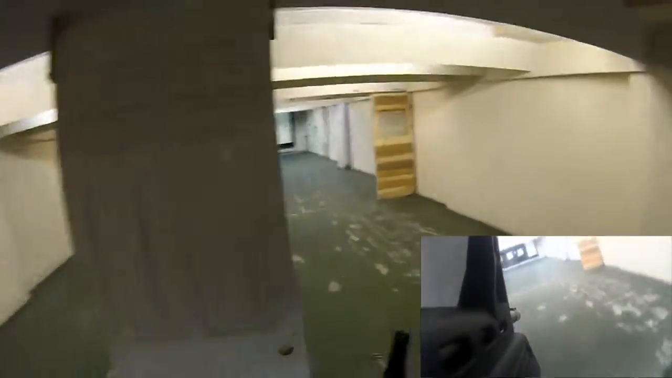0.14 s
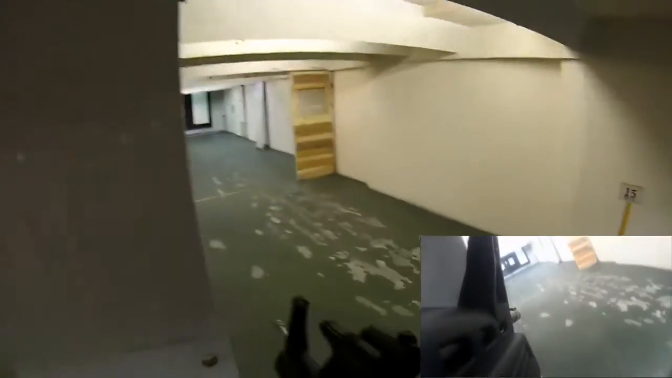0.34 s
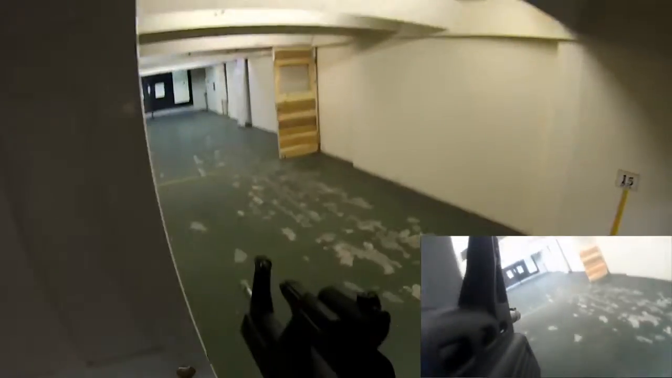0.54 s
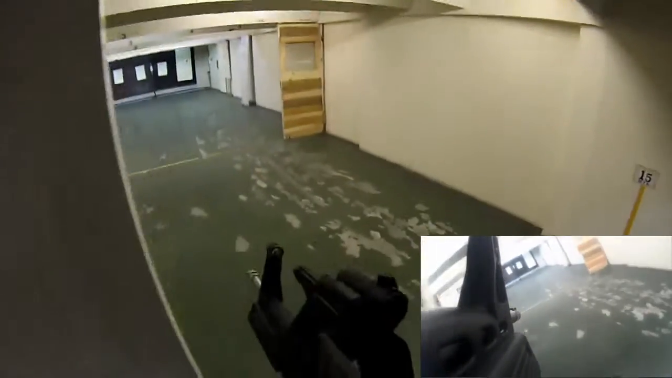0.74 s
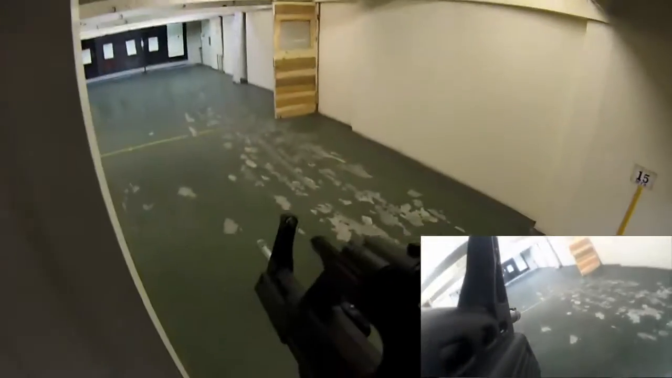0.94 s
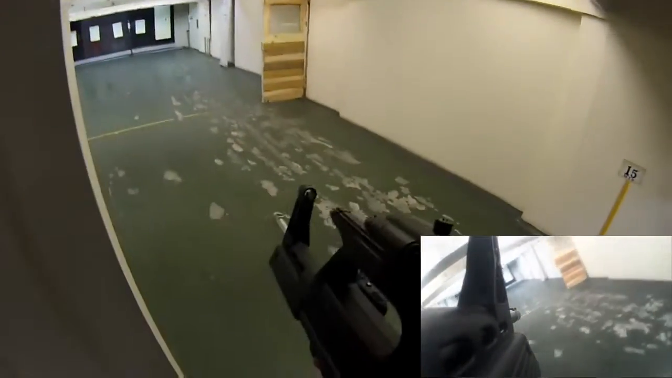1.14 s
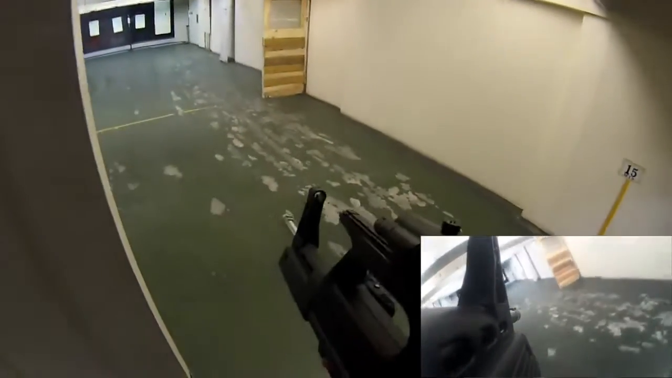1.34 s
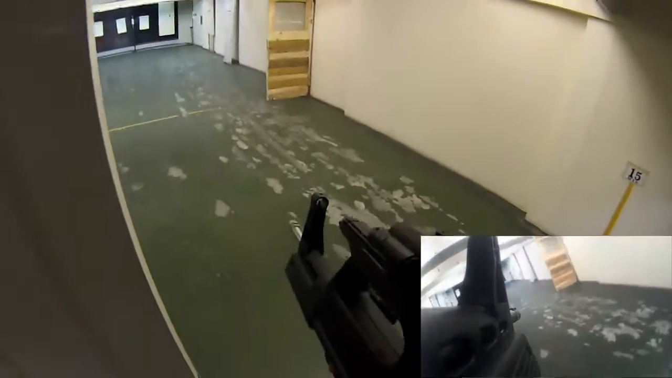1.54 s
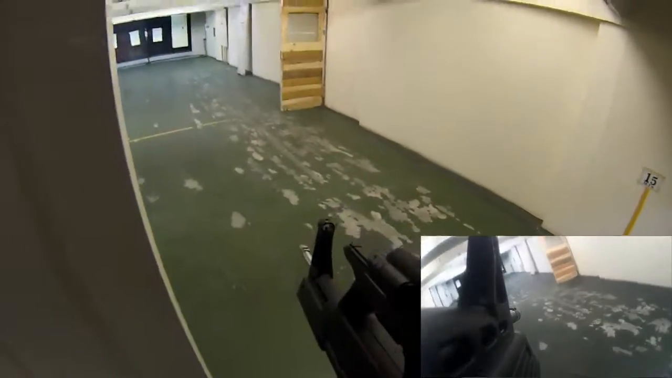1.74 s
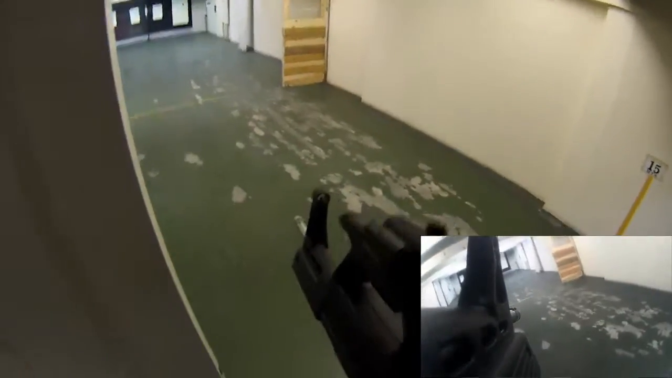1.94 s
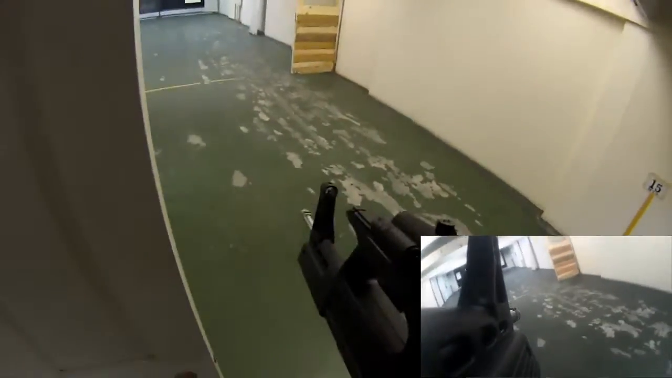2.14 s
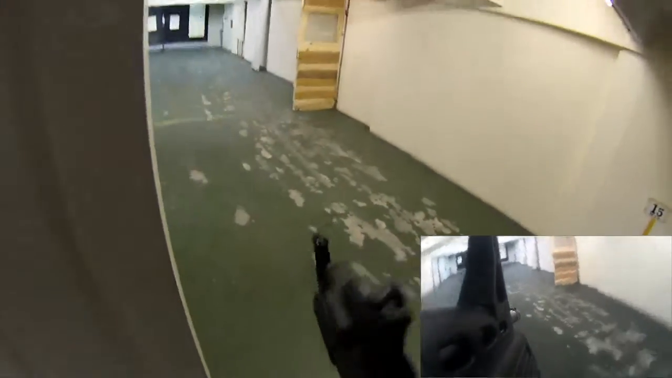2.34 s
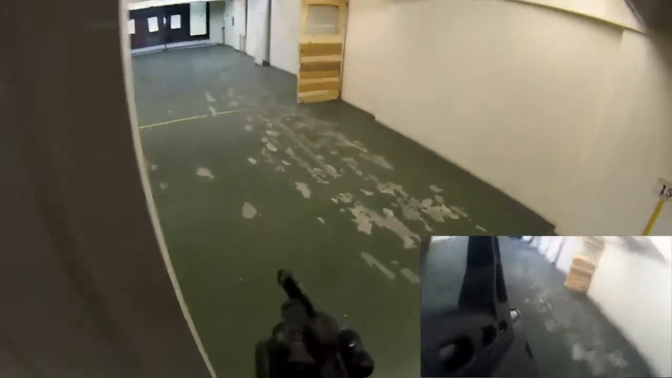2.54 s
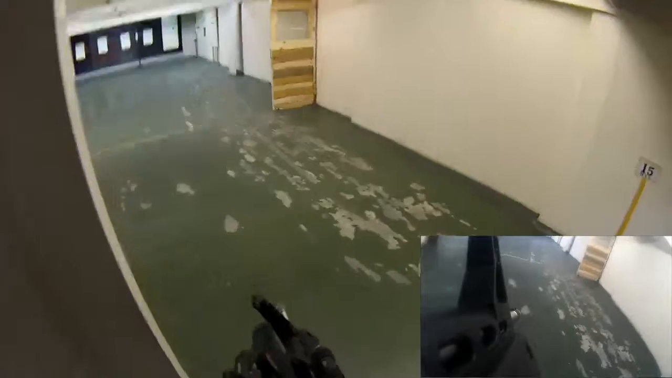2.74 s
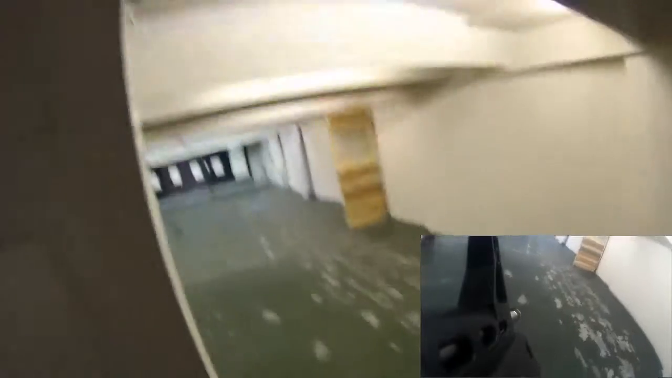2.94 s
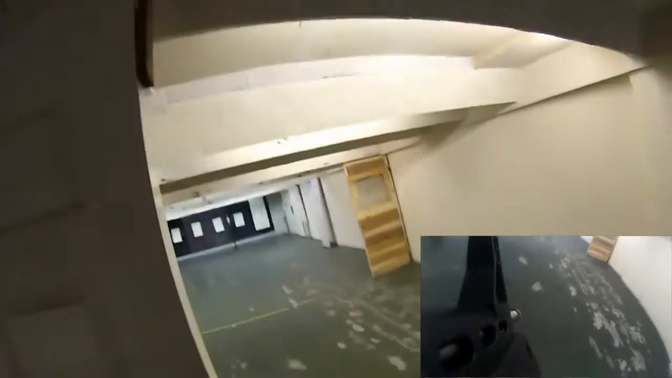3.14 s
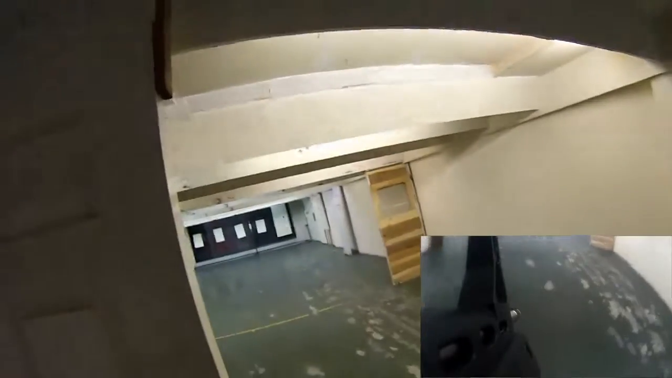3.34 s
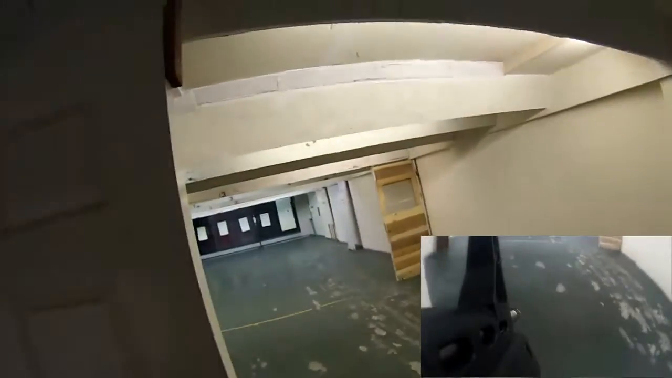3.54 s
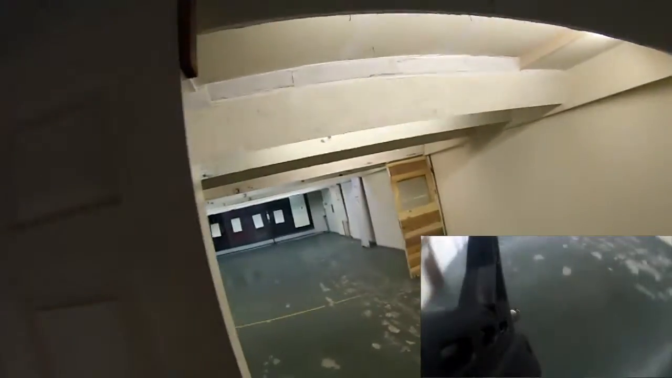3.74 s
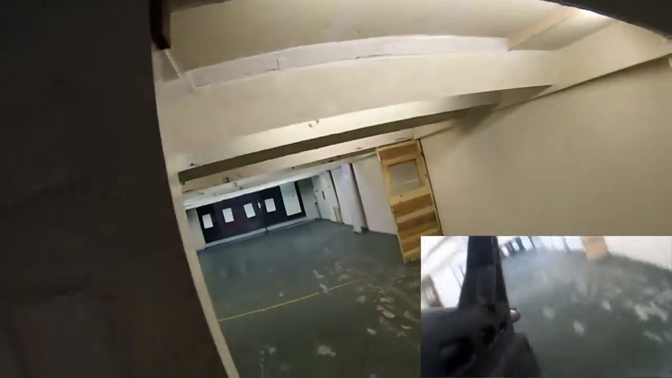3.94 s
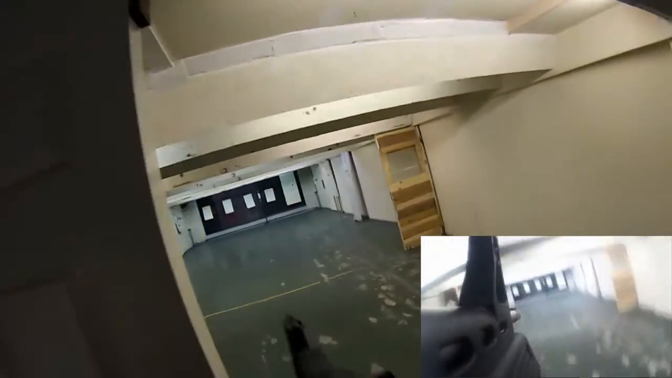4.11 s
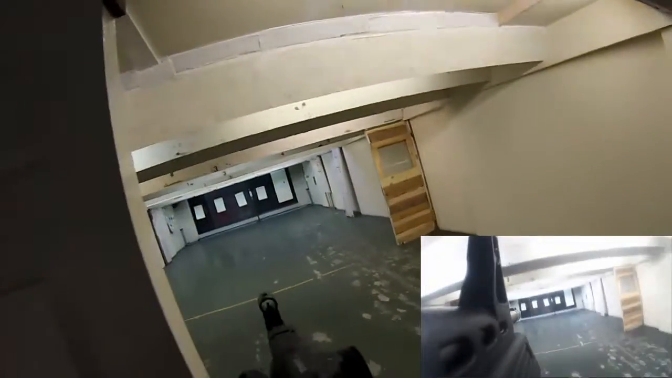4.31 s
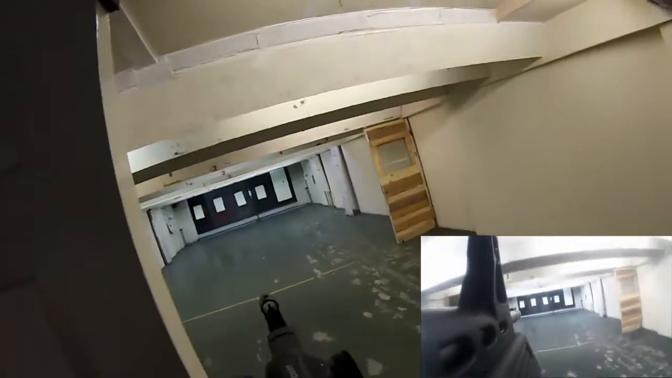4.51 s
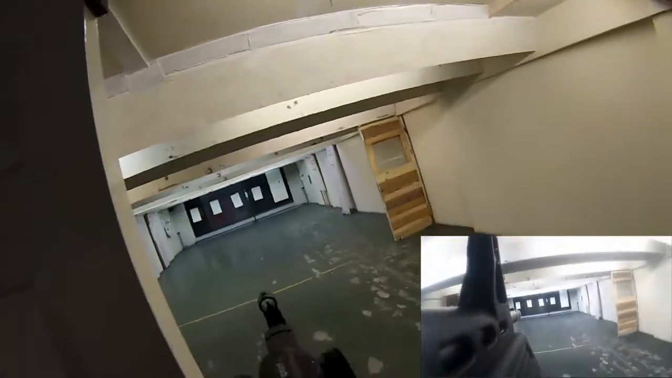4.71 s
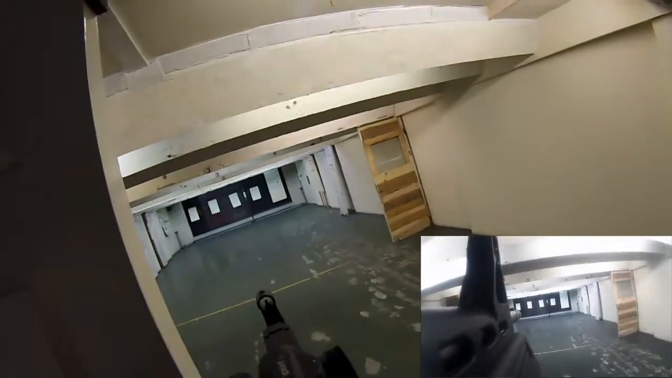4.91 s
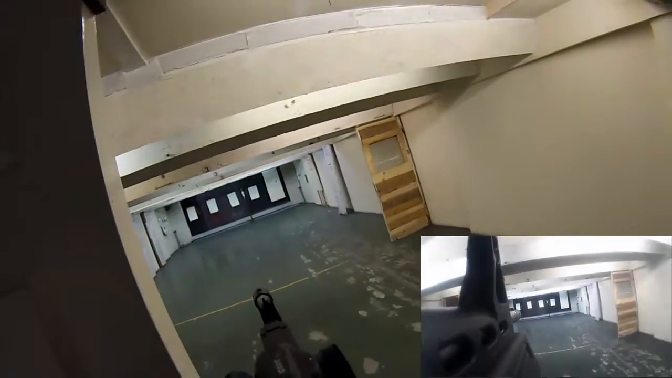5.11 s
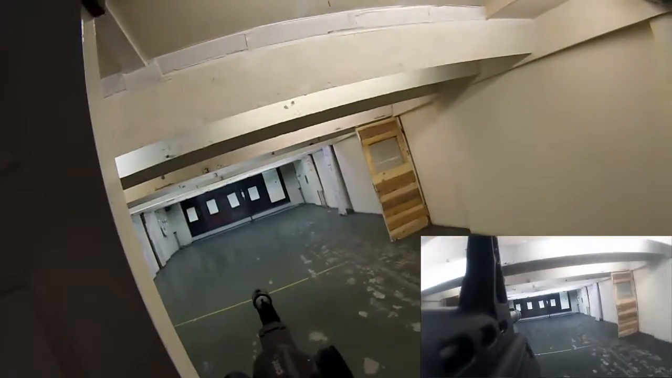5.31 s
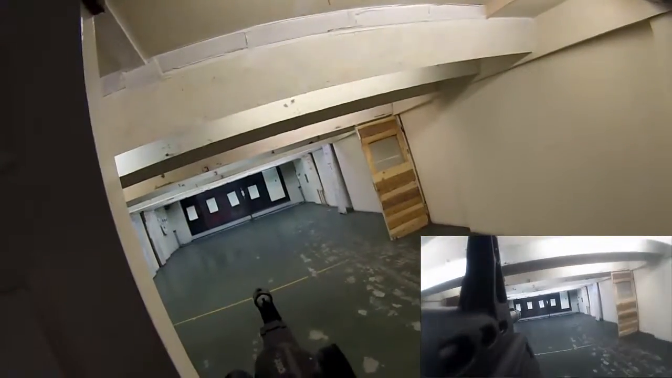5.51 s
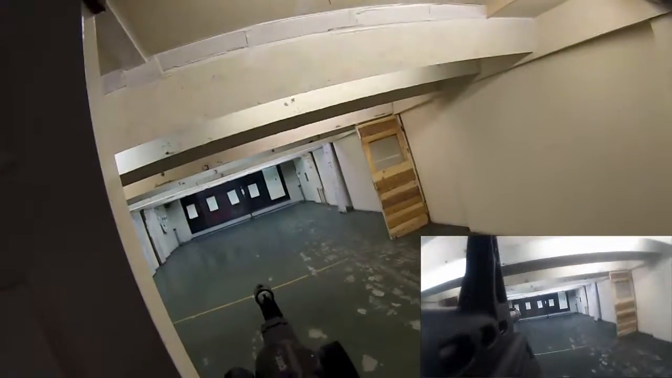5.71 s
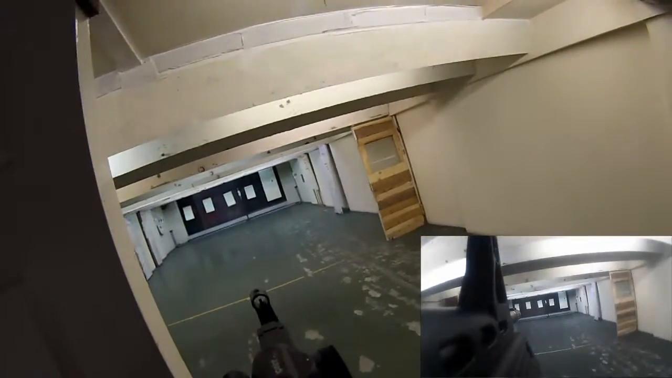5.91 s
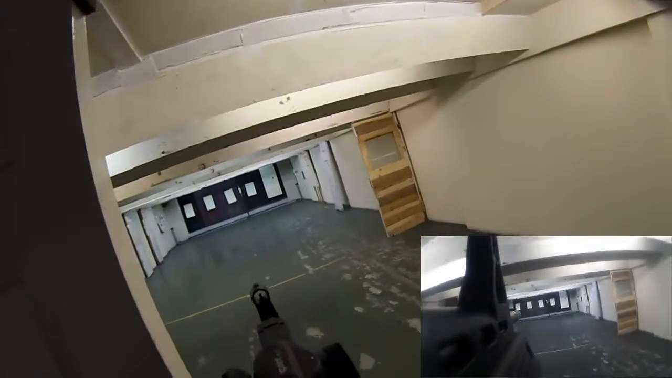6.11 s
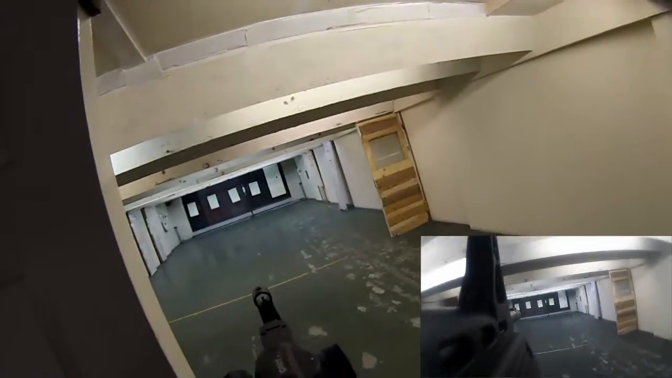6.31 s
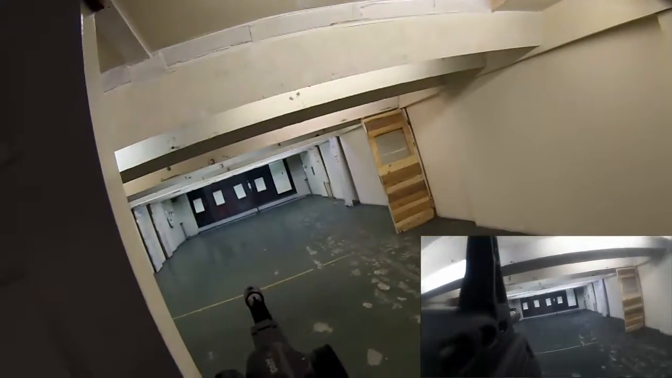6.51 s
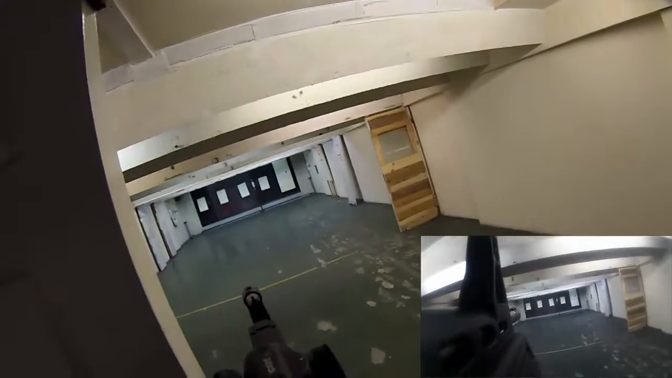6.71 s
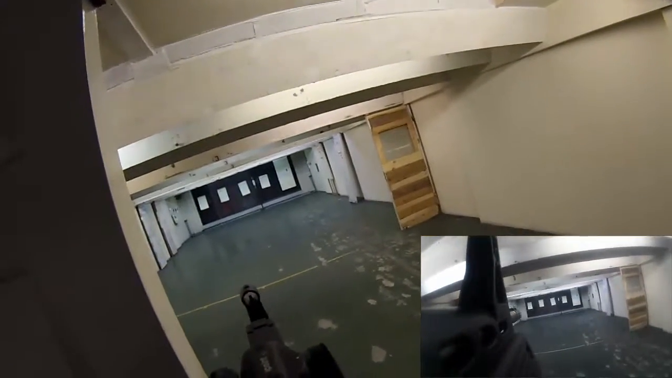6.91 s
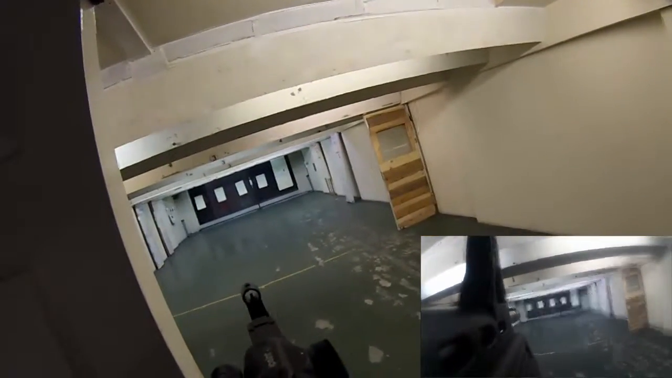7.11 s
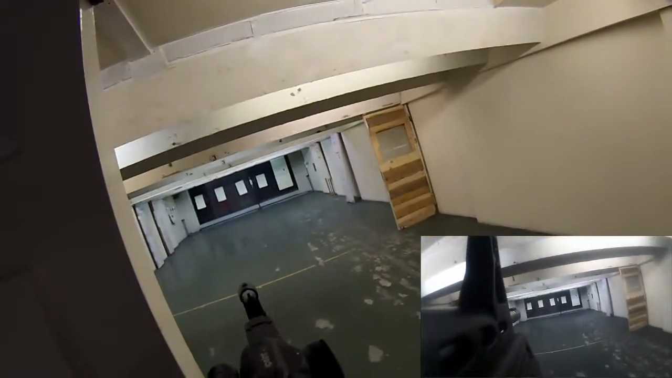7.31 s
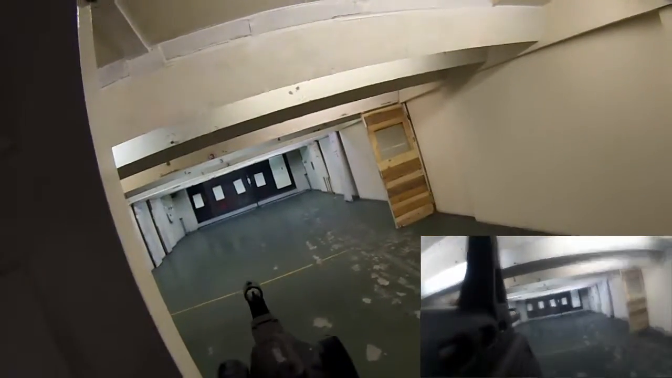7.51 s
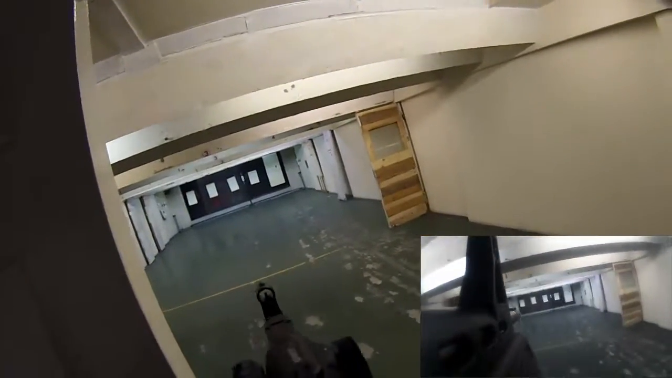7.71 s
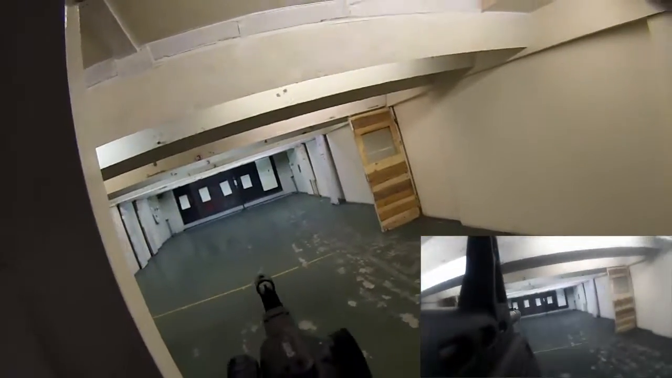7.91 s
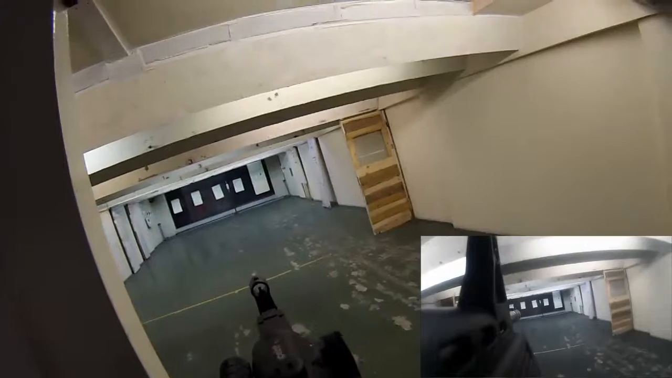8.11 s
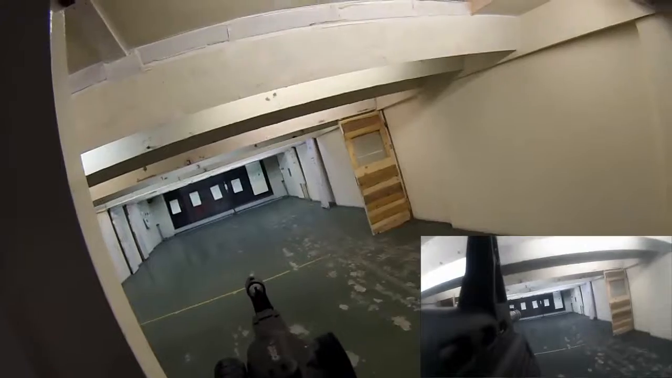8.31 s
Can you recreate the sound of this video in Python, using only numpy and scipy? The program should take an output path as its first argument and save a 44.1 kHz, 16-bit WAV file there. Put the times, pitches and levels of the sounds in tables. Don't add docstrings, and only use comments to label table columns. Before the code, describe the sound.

In a bare, reverberant indoor range, a cased head-worn microphone sits close to someone handling a rifle. From 0 to 1.9 s cloth rubs unevenly while gear bumps in hollow, boxy knocks, strongest around 0.2 s, with small steel ticks. From 2 to 2.6 s the magazine and action clack and rattle; sparser touches follow until firm metallic clacks at 3.4 s. At 3.7 s the bolt slams home, bright and quickly damped, its tone spreading into the hall. Then near silence: faint air and lamp hum, light clicks around 4.6-4.8 and 5.4-5.6 s. Rifle shots explode at 5.65, 6.22, 7.15 and 7.53 s, the last two in quick succession. Each is a harsh, clipped crack with a low push, rapid slaps off pillar and walls, and a long diffuse tail; the sound ducks at every blast, then recovers as the final reverberation fades.

```python
import sys
import numpy as np
from scipy import signal
from scipy.fft import rfft, irfft
from scipy.io import wavfile
from scipy.ndimage import uniform_filter1d

SR = 44100
rng = np.random.default_rng(int(sys.argv[2]) if len(sys.argv) > 2 else 0)


def master(y):
    cut = np.clip(np.atleast_2d(y).T, -1, 1)
    pcm = np.round(cut * 32767)
    wavfile.write(sys.argv[1], SR, pcm.astype(np.int16))


def natural_amplitude(level_db):
    exponent = np.asarray(level_db, float) / 20
    return 10 ** exponent


N = 368235

# f/Hz, density level/dB
AIR_COLOUR = [(15, -43.5), (25, -10), (68, -26), (102, -1.5), (152, -22.5), (188, 2), (258, -13.5),
              (405, -9), (462, -20), (706, -15), (14100, -36.5)]
AIR_DB = -62.5
# f/Hz, level/dB
LAMP_HUM = [(102.3, -72), (199.2, -80), (398.4, -80), (500.6, -78), (699.8, -79), (899.0, -83)]
# f/Hz, density level/dB
CLOTH_COLOUR = [(24, -29.5), (40, 3), (151, -20.5), (192, 4.5), (466, 0.5), (904, 10.5), (1240, -30),
                (1890, -6.5), (2660, -17), (3320, -17.5), (14100, -40.5)]
# t/s, cloth level/dB, body sway level/dB
MOTION = [(.08, -47, -51), (.3, -42, -70), (.53, -50.5, -61), (.62, -43, -52), (.84, -49.5, -63),
          (1.1, -52, -58.5), (1.66, -56.5, -70), (1.9, -50.5, -67), (2.14, -44.5, -55), (2.31, -41, -64),
          (2.36, -59.5, -61), (2.73, -57, -67), (3.3, -52, -63), (3.4, -45.5, -66), (3.62, -52.5, -60),
          (3.699, -28, -72), (3.9, -82, -67.5), (8.3, -83, -91)]
BRIGHT_DB, BRIGHT_PER_DB = 3, 0.58

# t/s, peak level/dB, f/Hz, metal part under the blow/dB
GEAR = [(.009, -33, 880, -8), (.055, -30.5, 708, -9.5), (.131, -32, 668, -30), (0.181, -21, 1040, -15.5),
        (0.19, -15.5, 695, -12), (.202, -9.5, 753, -35), (.257, -21.5, 940, -30), (.334, -14, 664, -15.5),
        (.392, -28.5, 859, -3.5), (0.44, -33, 853, -30), (.506, -24, 582, -26), (.69, -22.5, 575, -19),
        (.88, -28.5, 880, -4.5), (.962, -23, 870, -15), (1.038, -32.5, 783, -13), (1.076, -34.5, 654, -30),
        (1.172, -25, 653, -7), (1.229, -31, 503, -12), (1.267, -28, 942, -6), (1.289, -20.5, 584, -10.5),
        (1.474, -33.5, 650, -22), (1.602, -33, 638, -30), (1.636, -16.5, 674, -14), (1.802, -34, 590, -13),
        (1.862, -33, 580, -30), (1.886, -27.5, 640, -12.5)]
# t/s, peak level/dB, f/Hz, metal part under the blow/dB
RELOAD = [(1.968, -25.5, 735, -14), (1.984, -19.5, 564, -11), (2.088, -26.5, 570, -25),
          (2.108, -19.5, 570, -10), (2.128, -24, 585, -11.5), (2.207, -23, 1015, -31),
          (2.221, -16.5, 972, -36.5), (2.271, -15.5, 600, -8.5), (2.507, -38.5, 611, -26.5),
          (2.561, -13.5, 662, -32.5), (2.572, -15.5, 950, -31.5), (2.885, -24.5, 950, -15.5),
          (2.918, -45, 920, -28), (3.131, -23, 897, -16.5), (3.264, -40.5, 746, -32.5),
          (3.346, -25.5, 890, -26), (3.355, -24.5, 890, -25), (3.362, -11, 974, -28.5),
          (3.379, -18, 806, -27), (3.395, -6, 935, -30), (3.413, -12.5, 934, -10), (3.666, -26.5, 939, -24),
          (3.68, -20, 1010, -6), (3.698, -4.5, 890, -23.5), (3.717, -12, 903, -7)]
# t/s, peak level/dB, f/Hz, metal part under the blow/dB
AIM = [(4.609, -31.5, 917, -11), (4.648, -42, 630, -28), (4.701, -40.5, 844, -11.5), (4.776, -47, 630, -35),
       (4.817, -45, 703, -10), (5.391, -39, 923, -9), (5.502, -37, 990, -21.5), (5.6212, -31, 1030, -22),
       (5.6414, -16.5, 884, -6.5), (6.214, -33.5, 770, -30), (7.139, -26, 750, -26)]
# ring/ms, push length/ms, hall send/dB, metal hall send/dB
TOUCH = [
    (31, 5.7, -9, -18),
    (37.7, 6.5, -10, -15),
    (26, 4, -10, -14),
]
# f/Hz, ring length as a factor, level/dB
HOUSING_MODES = [(640, 0.61, -2), (950, 0.58, -1.5)]
RING_MS_PER_DB, SEND_PER_DB = 1, 0.1145

# t/s, peak level/dB, f/Hz, snap/ms, hall send/dB
STEEL_TICKS = [(.1989, -20, 2320, 53, -11), (.2074, -30.5, 3120, 31, -3), (.7756, -36, 2620, 24, -17),
               (1.3014, -38.5, 2350, 27, -5), (2.0154, -39, 2250, 24, -19),
               (2.2243, -14.5, 3700, 22, -13.5), (2.5596, -13.5, 2540, 50, -12.5),
               (2.5711, -13, 2650, 35, -30), (3.1233, -43.5, 2540, 33, -5), (3.3613, -15, 3050, 11, 2),
               (3.3932, -9, 3640, 35, -15.5), (3.6995, -4.5, 3460, 22, -15.5), (4.3335, -52, 2180, 22, -17),
               (6.8094, -33.5, 2260, 20, -4)]
SNAP_MS, METAL_HZ, RING_SHARE = 42, (2150, 3500), 0.42
SPARKLE_DB, SPARKLE_PER_DB = -26.5, 0.43

# f/Hz, t60/s
HALL_T60 = [(60, 1.2), (250, 0.57), (600, 1.15), (1500, 1.126), (3500, 1.07), (7000, 0.74), (10000, 0.77),
            (14000, 0.81)]

# f/Hz, level/dB, free ring t60/s
BOLT_MODES = [(2160, -10.5, 0.28), (2550, -12.5, 0.23), (3460, -9.5, .12), (4450, -2.5, 0.27),
              (5070, -0.5, .12), (5260, -0.5, 0.13), (5600, -2.5, 0.078), (6440, -3.5, .07),
              (6350, -19, 0.091), (8340, -7, 0.03), (3036, -6.5, 0.019), (10700, -12, 0.02)]
BOLT_S, BOLT_DB, BOLT_SEND_DB = 3.715, -17.5, 2.5
BOLT_DAMPING = 0.085

# t/s, tail level/dB, low push level/dB, pillar echo level/dB, gain recovery/s
SHOTS = [
    (5.651, -10, -5, -0.5, 0.2),
    (6.2198, -10, -7.5, -4.5, 0.2),
    (7.1474, -8.5, 1, -4, 0.28),
    (7.5296, -8.5, -2.5, -1.5, 0.25),
]
DELAYS_MS = [-2.2, 0, .4, 4.2, 8.2, 8.4, 12.8, 28, 37, 84, 86.5, 3]
# level/dB, ring f/Hz, ring/ms, crack level/dB, share off the pillar (0 to 1)
ARRIVALS = [(-24, 1100, 7.4, -1.5, 0), (0, 3300, 7, -9, 0.048), (2.5, 890, 5.3, -11, 0),
            (-6.5, 1800, 7.6, -6.5, 0.43), (9.5, 2200, 5.56, -12, 1), (4.5, 700, 5.4, -15.5, 0.98),
            (-12, 3700, 8, -16.5, 0.61), (-17.5, 792, 31, 3.5, 0.38), (-28, 1270, 30, 0.5, 0.15),
            (-17.5, 780, 45, -5, 0.48), (-15, 2050, 12, -3, 0), (-19, 170, 40, -36, 0.34)]
# f/Hz, density level/dB
TAIL_COLOUR = [(24, -56), (40, -50), (151, -13), (218, -14), (433, -8), (466, -12), (707, -2), (1100, -2),
               (1240, -9.5), (1890, -2), (2660, -11.5), (3240, -8.5), (3850, -16.5), (4800, -15),
               (14100, -34)]
BLAST_DB = 13.5
SMEAR = 0.051

# f/Hz, level/dB
CASE_COLOUR = [(4600, 0), (5200, 0.5), (5900, 0), (6900, 3), (7800, -1), (8700, -0.3), (14000, -1.2)]
EDGE_HZ = 14250
DUCK_DB, AHEAD_S, AHEAD_SHARE = 10.5, 0.022, 0.26


def read(points, hz):
    f, value = np.transpose(points)
    return np.interp(np.log(hz + 1), np.log(f + 1), value)


def evened(x):
    return x / np.sqrt(np.mean(x ** 2) + 1e-20)


def band(x, lo_hz, hi_hz, order=2):
    return signal.sosfilt(signal.butter(order, [lo_hz, hi_hz], "band", fs=SR, output="sos"), x)


def add(mix, s, sound):
    part = mix[round(s * SR):][:len(sound)]
    part += sound[:len(part)]


def noise(colour, size, fade=0, patchy_db=0.44):
    t = np.arange(size // 128 + 5) * 128 / SR
    hz = np.fft.rfftfreq(512, 1 / SR)
    real, imag, patch = rng.standard_normal((len(t), len(hz), 3)).T
    patch = uniform_filter1d(patch, size=6, axis=0)
    patch = evened(uniform_filter1d(patch, size=10, axis=1))
    db = read(colour, hz)[:, None] + patchy_db * patch
    fall_db = fade * 60 * t / read(HALL_T60, hz)[:, None]
    left = np.hypot(natural_amplitude(-fall_db), natural_amplitude(-10.5 - 0.59 * fall_db))
    spectra = (real + 1j * imag) * natural_amplitude(db) * left
    x = signal.istft(spectra, nperseg=512, noverlap=384)[1][:size]
    return x / np.sqrt(np.mean(x[:4000 if fade else size] ** 2))


def background():
    s, rub_points, sway_points = np.transpose(MOTION)
    t = np.arange(N) / SR
    rub_db = np.interp(t, s, rub_points)
    cloth = band(noise(CLOTH_COLOUR, N, patchy_db=0.6), 140, 15000)
    brightness = natural_amplitude(BRIGHT_DB + BRIGHT_PER_DB * (rub_db + 48)) - 1
    cloth += brightness * band(cloth, 1500, 15000)
    grain = natural_amplitude(2.1 * evened(uniform_filter1d(rng.standard_normal(N), size=500)))
    rubbing = natural_amplitude(rub_db) * cloth * evened(grain)
    rumble = natural_amplitude(np.interp(t, s, sway_points)) * evened(band(rng.standard_normal(N), 6.7, 90))
    air = natural_amplitude(AIR_DB) * noise(AIR_COLOUR, N)
    hum = sum(np.sqrt(2) * natural_amplitude(db) * np.sin(2 * np.pi * (hz * t + rng.random())) for hz, db in LAMP_HUM)
    return rubbing + rumble + air + hum


def blows():
    return [row + touch for rows, touch in zip((GEAR, RELOAD, AIM), TOUCH) for row in rows]


def ring(hz, t60, size=4096):
    t = np.arange(size) / SR
    return np.sin(2 * np.pi * hz * t) * natural_amplitude(-60 * t / max(t60, .002))


def as_click(sound, shape):
    return shape * np.linalg.norm(sound) / np.linalg.norm(shape)


def knocks(near, send):
    rows = blows()
    t_ms = np.arange(1024) / SR * 1000
    impulse = 1. * (t_ms == 0)
    rags = rng.standard_normal((len(rows), 1024))
    for (s, db, hz, _, ring_ms, push_ms, send_db, _), rag in zip(rows, rags):
        ring_s = (ring_ms + RING_MS_PER_DB * (db + 27.5)) / 1000
        force = rag * np.exp(-t_ms / push_ms) * np.minimum(t_ms / 0.56, 1)
        push = band(force, 0.55 * hz, 1500)
        housing = sum(natural_amplitude(mode_db) * ring(f, factor * ring_s) for f, factor, mode_db in HOUSING_MODES)
        sound = signal.fftconvolve(push, ring(hz, ring_s) + housing)
        sound *= natural_amplitude(db) / abs(sound).max()
        add(near, s, sound)
        blunt = band(impulse, 0.53 * hz, 1.09 * hz) + 0.024 * ring(hz, 0.015, size=1024)
        add(send, s, natural_amplitude(send_db + SEND_PER_DB * (db + 19)) * as_click(sound, blunt))


def ticks(near, send):
    rows = blows()
    lo_hz, hi_hz = METAL_HZ
    pitches = lo_hz + (hi_hz - lo_hz) * rng.random(len(rows)) ** 2
    shaken = [(s, db + metal_db, hz, SNAP_MS, send_db)
              for (s, db, _, metal_db, *_, send_db), hz in zip(rows, pitches)]
    rows = STEEL_TICKS + shaken
    n = np.arange(2048)
    rags = rng.standard_normal((len(rows), 2048)) * np.minimum(n / 49.0, 1)
    rags *= natural_amplitude(2.0 * evened(uniform_filter1d(rags[::-1], size=50, axis=1)))
    click = natural_amplitude(-30. * np.arange(1024))
    body = evened(band(click, 1150, 4200))
    sparkle = evened(band(click, 5000, 12500))
    for (s, db, hz, snap_ms, send_db), rag in zip(rows, rags):
        plain = (1 - RING_SHARE) * body - natural_amplitude(SPARKLE_DB + SPARKLE_PER_DB * (db + 31)) * sparkle
        metal = RING_SHARE * evened(ring(hz, 0.007, size=1024))
        snap = rag * natural_amplitude(-6e4 * n / SR / max(snap_ms, 2))
        sound = signal.fftconvolve(snap, plain + metal)
        sound *= natural_amplitude(db) / abs(sound).max()
        add(near, s, sound)
        add(send, s, natural_amplitude(send_db) * as_click(sound, plain + 0.91 * metal))


def tail(colour, rise_s, fade=1):
    t = np.arange(SR * 3 // 2) / SR
    return noise(colour, len(t), fade) * (1 - np.exp(-(t / rise_s) ** 2))


def bolt(near, send):
    chatter = rng.standard_normal(400) * np.hanning(400) ** 2
    steel = sum(natural_amplitude(db) * ring(hz, BOLT_DAMPING * t60, size=8192) for hz, db, t60 in BOLT_MODES)
    sound = natural_amplitude(BOLT_DB) * steel
    slam = signal.fftconvolve(sound, chatter / np.linalg.norm(chatter))
    add(near, BOLT_S - .003, natural_amplitude(1.0) * slam)
    add(send, BOLT_S, natural_amplitude(BOLT_SEND_DB) * sound)


def shots(out):
    t = np.arange(4096) / SR
    cracks = band(rng.standard_normal((len(SHOTS), len(ARRIVALS), 4096)), 350, 3200, order=1)
    push = 0.066 * np.exp(-((t - .004) / .0017) ** 2) - np.exp(-((t - .0115) / 0.0017) ** 2)
    push = band(push, 24, 400)
    for (s, tail_db, push_db, pillar_db, _), row in zip(SHOTS, cracks):
        for ms, (db, hz, ring_ms, crack_db, pillar), crack in zip(DELAYS_MS, ARRIVALS, row):
            if ms >= 20:
                crack = band(crack, 440, 2000)
            sound = natural_amplitude(crack_db + 13.0) * crack - np.sin(2 * np.pi * hz * t)
            rise_s = (.8 + SMEAR * max(ms - 13, 0)) / 1e3
            decay = natural_amplitude(-6e4 * np.maximum(t - rise_s + .0008, 0) / ring_ms)
            swell = np.minimum(t / rise_s, 1) * decay
            add(out, s + ms / 1000, natural_amplitude(BLAST_DB + db + pillar * pillar_db) * swell * sound)
        add(out, s - .003, natural_amplitude(push_db) * push)
        add(out, s, natural_amplitude(tail_db) * tail(TAIL_COLOUR, rise_s=0.0014))


def scene():
    near, send = np.zeros((2, N))
    for add_source in (knocks, ticks, bolt):
        add_source(near, send)
    hall = tail([(100, -9), (800, 5), (4000, 8.5), (14000, 8)], rise_s=0.0037, fade=1.407)
    hall /= np.linalg.norm(hall)
    shots(near)
    reverberant = natural_amplitude(4.5) * signal.fftconvolve(send, hall)[:N]
    return (near + reverberant + background())[None]


def band_limit(x):
    return signal.sosfilt(signal.butter(12, 14280, fs=SR, output="sos"), x)


def record(dry):
    t = np.arange(N) / SR
    dips = [np.interp(t - s, [-AHEAD_S, -.004, -.002, back_s], [0, AHEAD_SHARE, 1, 0])
            for s, *_, back_s in SHOTS]
    duck = np.max(dips, axis=0)
    coloured = irfft(rfft(dry) * natural_amplitude(read(CASE_COLOUR, np.fft.rfftfreq(N, 1 / SR))), N)
    limited = np.clip(coloured * natural_amplitude(-DUCK_DB * duck), -1.05, 1.05)
    edged = signal.oaconvolve(limited, signal.firwin(255, EDGE_HZ, fs=SR)[None], "same")
    return band_limit(np.clip(edged, -1, 1))


dry = scene()
out = record(dry)
master(out)
```